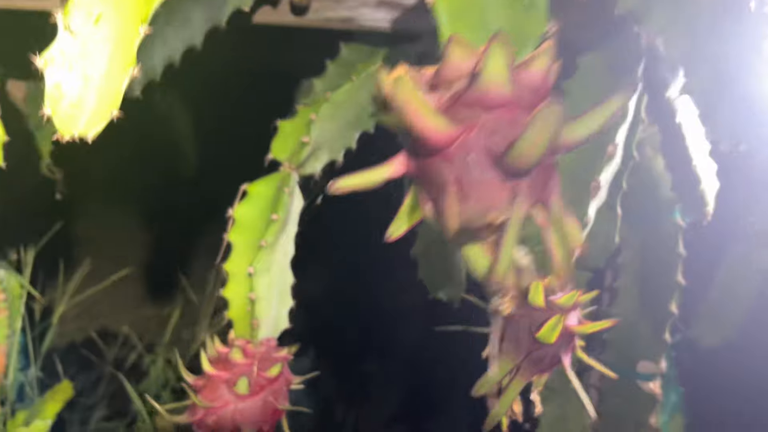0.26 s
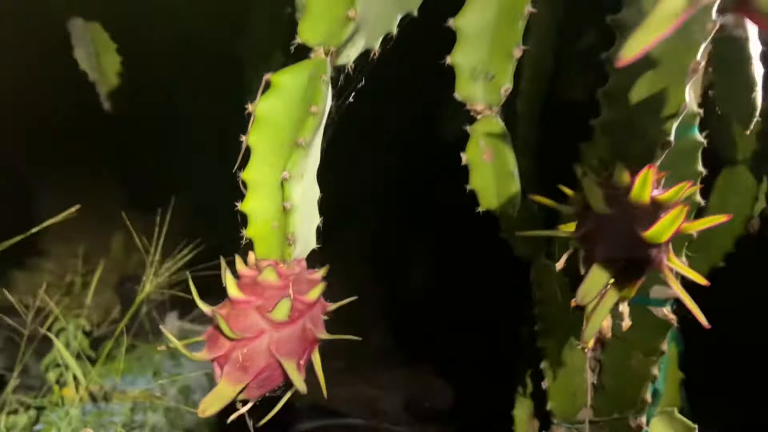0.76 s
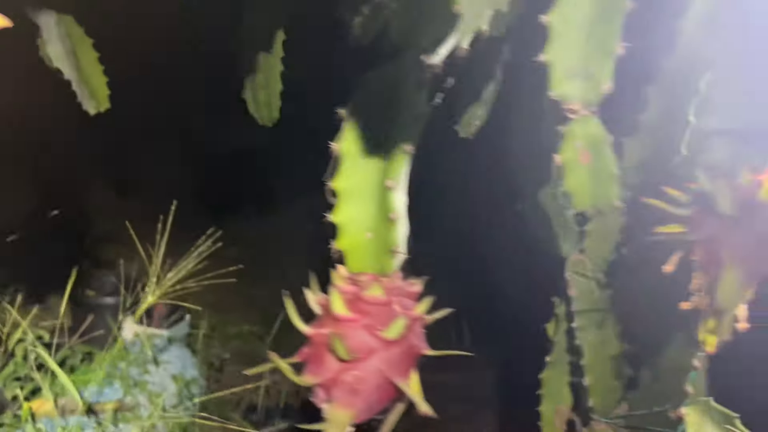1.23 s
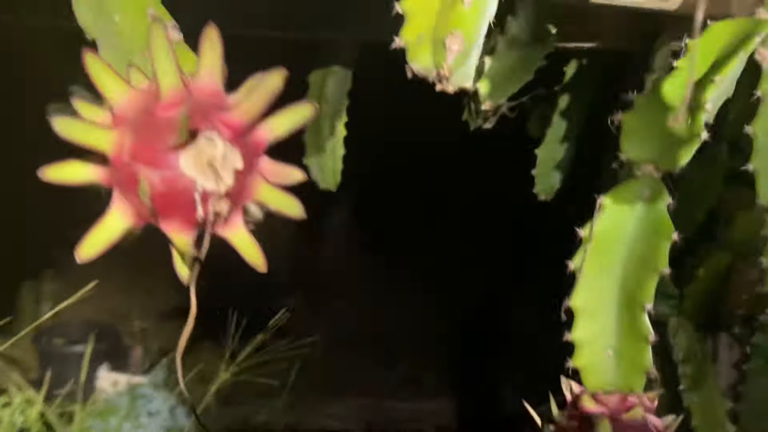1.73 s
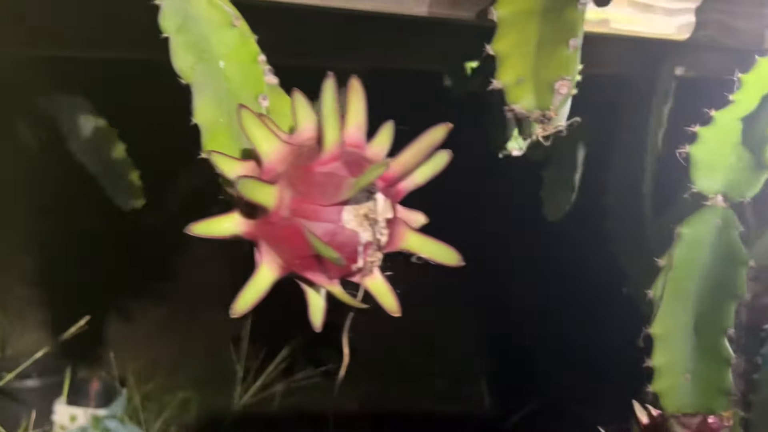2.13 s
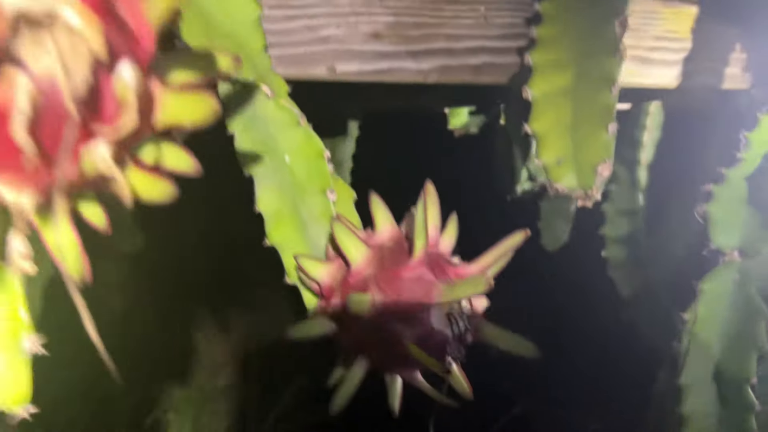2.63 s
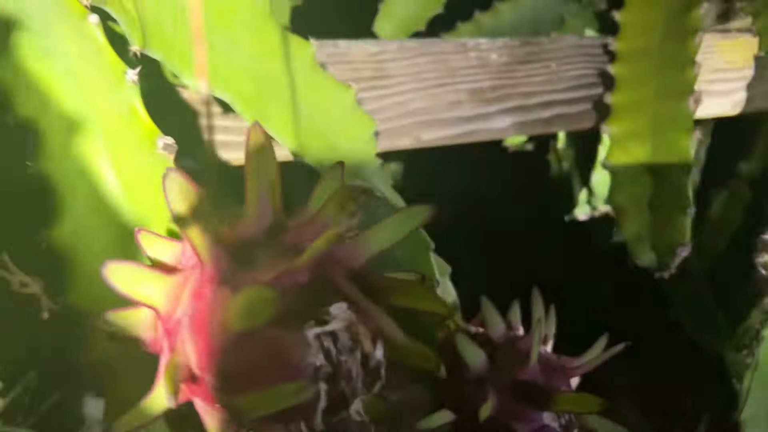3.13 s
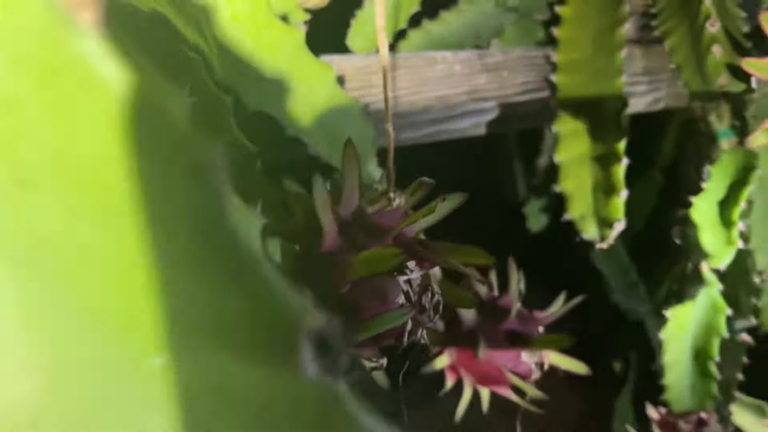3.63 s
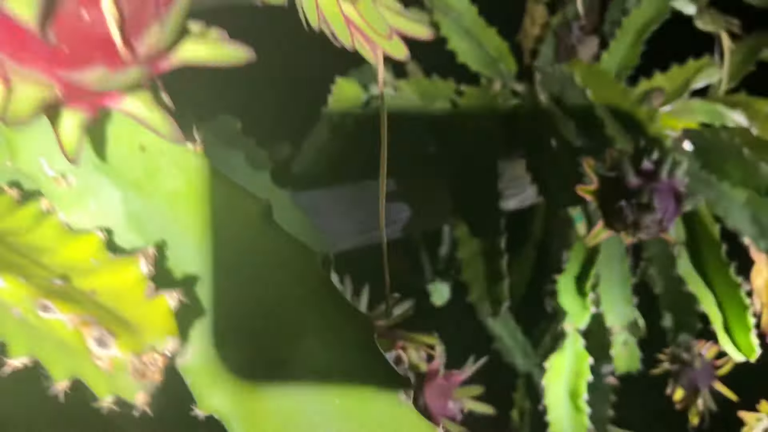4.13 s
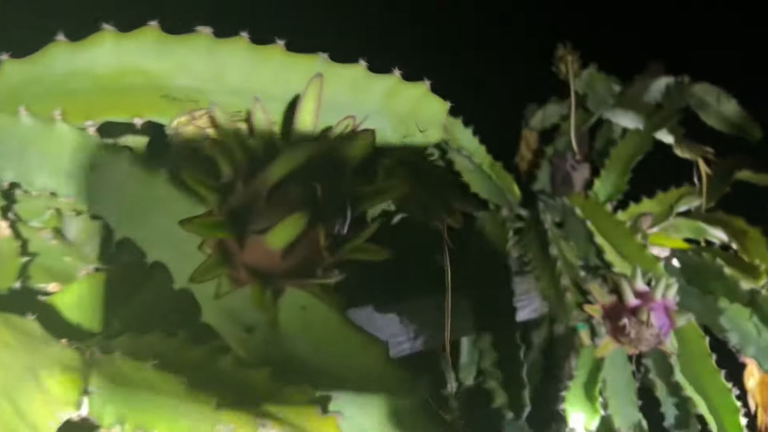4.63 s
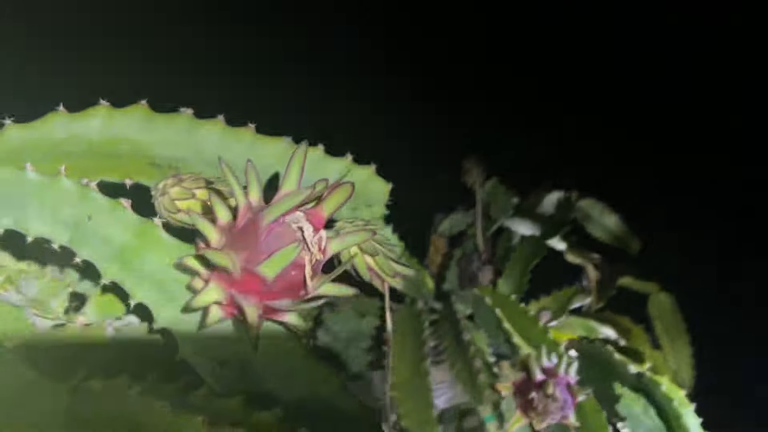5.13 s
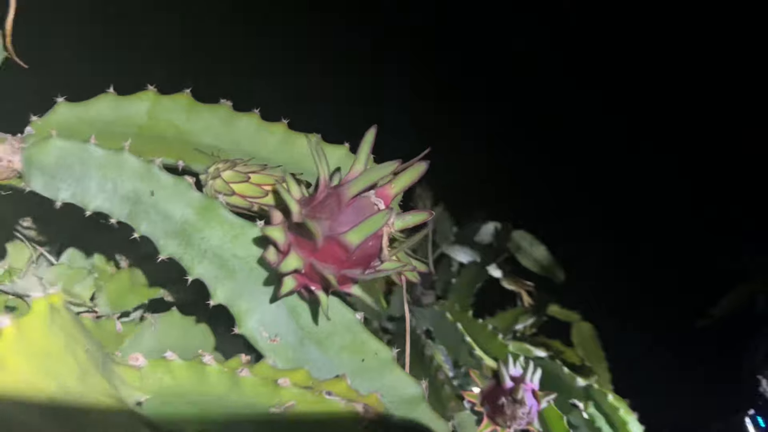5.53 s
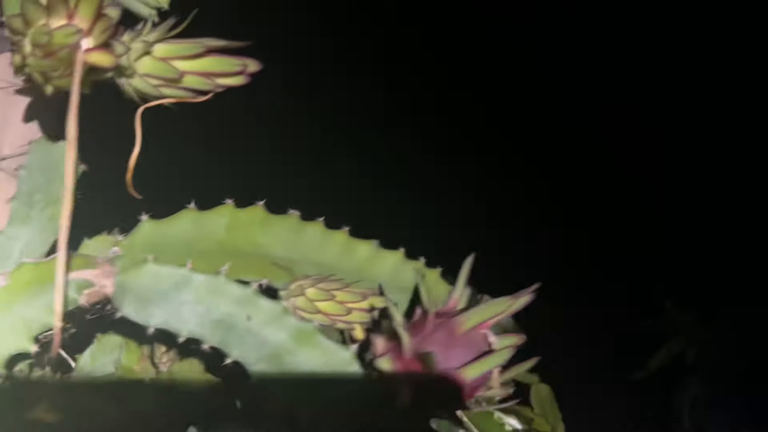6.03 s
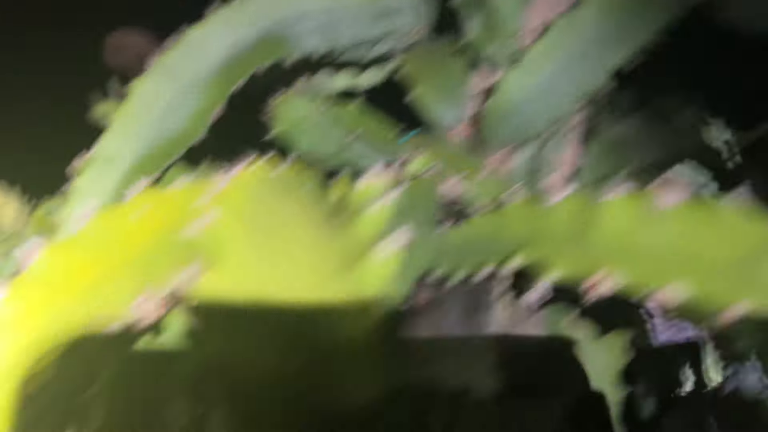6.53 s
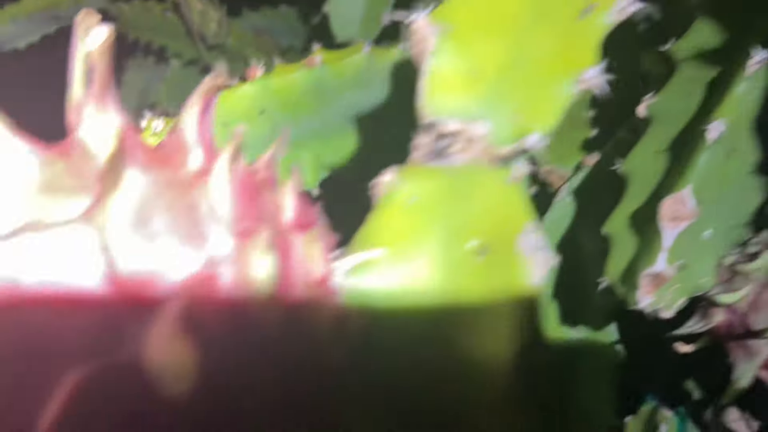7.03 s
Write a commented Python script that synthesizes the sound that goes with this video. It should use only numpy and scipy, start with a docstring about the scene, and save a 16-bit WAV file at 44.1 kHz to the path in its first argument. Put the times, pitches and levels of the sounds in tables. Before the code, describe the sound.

Steady high insect shrilling at night, distant frogs answering a close whistling frog, with leaves brushing, soft footfalls and dry crunches growing busier.

```python
"""Fruit farm at night, among cactus vines. A near coqui frog calls "co-qui" three times, as gliding tones with
weak harmonics and delayed echoes; others answer from afar, blurred by dense echoes. Insects shrill steadily:
noise through narrow resonances, and trains of wing-stroke tones. Someone steps slowly through the plants:
stems and leaves brush as coloured noise, dry litter crunches as runs of fractures, and soft footfalls thud
as decaying, sinking tones. One passage comes twice."""
import sys
import numpy as np
from scipy import signal
from scipy.fft import rfft, irfft
from scipy.io import wavfile

SR = 44100
rng = np.random.default_rng(int(sys.argv[2]) if len(sys.argv) > 2 else 0)


def unload_audio(sound):
    """Save the sound as a 16-bit wav file, at the path given as the first command line argument."""
    columns = np.transpose(np.atleast_2d(sound))
    # keep every value between -1 and 1, then stretch to whole-number steps
    steps = np.round(np.clip(columns, -1, 1) * 32767)
    wavfile.write(sys.argv[1], SR, steps.astype(np.int16))


N = 321035
TIME = np.arange(N) / SR

# In all tables, balance_db is left over right, and the level_db of a spectrum is relative.
# Shape of a frog's low note, scaled for each call: [start_s, pitch_hz, level_db]
CO = [(0, 1540, -16), (.006, 1510, 2), (.022, 1533, 7.5), (.05, 1510, 3.5), (.07, 1510, 2.5),
      (.09, 1497, -6.5), (.103, 1520, -20), (.115, 1490, -58)]


def from_db(db):
    """Decibels are twenty times the logarithm of the amplitude ratio."""
    return 10 ** (np.asarray(db) / 20)


def rms_one(x):
    """Power is the mean square: scale it to one."""
    return x / np.sqrt(np.mean(x ** 2) + 1e-20)


def curves(rows, t=TIME):
    """Linear interpolation in time of each column after the first."""
    s, *columns = np.transpose(rows)
    return [np.interp(t, s, column) for column in columns]


def pan(balance_db):
    """Interaural level difference: left and right gains, each taking half of it."""
    return from_db(np.array([[.5], [-.5]]) * balance_db)


def add(out, start_s, sound):
    """Superposition: mix a short stereo sound in at a time."""
    at = max(round(start_s * SR), 0)
    out[:, at:at + sound.shape[1]] += sound[:, :N - at]


def twice(rows):
    """Repetition: one passage is heard twice; events from 2.8 s to 4.15 s are played again 3.117 s later."""
    passage_s, passage_end_s, return_s = 2.8, 4.15, 3.117
    again = [(s + return_s, *rest) for s, *rest in rows if passage_s <= s < passage_end_s]
    return list(rows) + again


def stereo_noise(likeness, size=N):
    """Partial coherence: white noise whose two sides have the given correlation."""
    mid, side = rng.standard_normal((2, size))
    alike = np.clip(likeness, -1, 1)
    return (np.sqrt(1 + alike) * mid + np.sqrt(1 - alike) * side * [[1], [-1]]) / np.sqrt(2)


def drift(rate):
    """Random modulation of unit power: straight lines between chance values, rate of them per second."""
    knots = rng.standard_normal(4096)
    return rms_one(np.interp(TIME * rate, np.arange(len(knots)), knots))


def colour(x, spectrum, size=4096):
    """Minimum-phase filtering by the folded cepstrum; white noise keeps its power."""
    hz, db = np.transpose(spectrum)
    log_bins = np.log(np.fft.rfftfreq(size, 1 / SR) + 1)
    gain = from_db(np.interp(log_bins, np.log(hz), db))
    cepstrum = irfft(np.log(gain / np.sqrt(np.mean(gain ** 2))))
    # Folding negative time onto positive time makes the response causal
    cepstrum[1:size // 2] *= 2
    cepstrum[size // 2 + 1:] = 0
    response = irfft(np.exp(rfft(cepstrum)))
    return signal.oaconvolve(x, response[None], axes=1)[:, :N]


def scatter(x, t60, size=30000):
    """Diffuse scattering off the plants: dense decaying echoes, different on each side, at unit power."""
    t = np.arange(size) / SR
    echoes = rng.standard_normal((2, size)) * from_db(-60 * t / t60) * (t > .003)
    return signal.oaconvolve(x, rms_one(echoes) / np.sqrt(size), axes=1)[:, :N]


def delayed(x, ms):
    """Propagation delay: the same sound a little later."""
    return np.interp(TIME - ms / 1000, TIME, x, left=0)


def night_air():
    """Broadband noise, nearly incoherent between the sides: the faint hiss of still air, drifting in level."""
    # Spectrum of the night: [frequency_hz, level_db]
    night = [(20, -24), (60, 6.5), (150, 7), (450, 1.5), (1000, 5.5), (1600, 7.5), (2100, -1), (2800, 2.5),
             (3600, -9), (7500, -39), (9000, -84), (15500, -41)]
    level_db = -69.5 + 2.2 * drift(4.2)
    return from_db(level_db) * colour(stereo_noise(likeness=0.036), night)


def stirring_air():
    """Local turbulence: low noise on each microphone port, largely opposite in sign on the two."""
    # Spectrum of the stirring: [frequency_hz, level_db]
    stir_spectrum = [(15, -9), (45, 5.5), (70, 5), (140, -21), (400, -67)]
    level_db = -78.5 + 5 * drift(9)
    return from_db(level_db) * colour(stereo_noise(likeness=-0.7), stir_spectrum)


def high_buzz(level_db=-68, echo_db=-13, echo_ms=7.1, left_lag_ms=0.2458):
    """Interference and arrival time: a hissing rasp, doubled by a ground echo, reaches the right port first."""
    # Spectrum of the insect: [frequency_hz, level_db]
    buzz_spectrum = [(6500, -93), (8200, -9.5), (9200, 5), (10000, -2), (10700, 7), (11500, 5.5),
                     (12500, -2.5), (13500, -8), (15500, -14)]
    rasp = rng.standard_normal(N)
    rasp = rasp + from_db(echo_db) * delayed(rasp, echo_ms)
    sides = np.array([rms_one(delayed(rasp, left_lag_ms)), rms_one(rasp)])
    return from_db(level_db) * colour(sides, buzz_spectrum)


def chorus(flutter_db=1):
    """Resonance of noise: countless far wing scrapes merge into a few narrow, fluttering bands."""
    # Distant groups of singers: [wing_pitch_hz, spread_hz, relative level_db]
    singers = [(5280, 510, -19.5), (5943, 145, 1), (6050, 93, -2), (6246, 98, -3.5), (6580, 240, -21),
               (6400, 250, -43)]
    out = np.zeros((2, N))
    for hz, width_hz, db in singers:
        r = np.exp(-np.pi * width_hz / SR)   # pole radius of a two-pole resonator
        wing = [1 - r, 0, r - 1, 1, -2 * r * np.cos(2 * np.pi * hz / SR), r * r]
        song = rms_one(signal.sosfilt([wing, wing], stereo_noise(likeness=0)))
        out += song * from_db(db + flutter_db * drift(120))
    return rms_one(out)


def trill(hz, strokes, share, fall_hz, wander_hz=14, unsteady=0.012):
    """Stridulation at unit power: each wing stroke is a short tone that falls in pitch."""
    stroke_rate = strokes * (1 + unsteady * drift(3))
    cycle = (rng.random() + np.cumsum(stroke_rate) / SR) % 1
    stroke = np.minimum(cycle / share, 1)
    pitch = hz + fall_hz * (.5 - stroke) + wander_hz * drift(4.7)
    # The ports hear it a quarter cycle out of step
    phase = 2 * np.pi * np.cumsum(pitch) / SR + [[0], [np.pi / 2]]
    return rms_one(np.sin(np.pi * stroke) ** 2 * np.sin(phase))


def crickets():
    """Amplitude modulation: overlapping nearby trills swell gently in bouts and echo off the leaves."""
    # Single crickets, levels relative to the chorus: [wing_pitch_hz, level_db, strokes_per_s,
    # sounding_share of a stroke, fall_hz within a stroke, bouts_per_s, bout_depth_db, balance_db]
    singles = [(6060, -7, 17.3, .6, 160, 2.6, 2, 3), (6190, -9.5, 17.9, .6, 160, 1.85, 3, 3),
               (6130, -9.5, 13.4, .7, 200, .6, 3, 1), (5920, -8, 15.6, .8, 140, 2.6, 2, -1),
               (6010, -9.5, 58, .8, 220, .45, 2, 0), (6085, -8.5, 5.2, .95, 30, 1.3, 2, 0)]
    out = np.zeros((2, N))
    for hz, db, strokes, share, fall_hz, bouts, bout_db, balance_db in singles:
        bout_rate = bouts * (1 + 0.11 * drift(2.42))
        swell = from_db(bout_db * np.sin(2 * np.pi * np.cumsum(bout_rate) / SR))
        out += from_db(db) * pan(balance_db) * rms_one(swell * trill(hz, strokes, share, fall_hz))
    return out + from_db(-14.5) * scatter(out, t60=0.73)


def insects(gain_db=2, swell_db=.9):
    """Summed sources: the shrill swells a little by chance, and shifts as the microphone turns."""
    # The turning, levels before gain_db: [time_s, level_db, balance_db]
    turning = [(0.0, -49, 6.5), (0.5, -49.5, 8), (1.1, -50.5, 5), (1.6, -49.5, 5.5), (2.15, -52, 3),
               (2.35, -50.5, 7), (3.65, -49.5, 2.5), (3.81, -49.5, 6.5), (4.03, -51, 6), (4.36, -49.5, 7),
               (4.85, -49.5, 5.5), (5.25, -50.5, 6), (6.0, -50, 5.5), (6.77, -48.5, 1), (6.9, -50.5, 5.5),
               (7.28, -51, 4.5)]
    level_db, balance_db = curves(turning)
    gain = from_db(level_db + gain_db + swell_db * drift(8.6))
    return gain * pan(balance_db) * rms_one(chorus() + crickets())


def fast_cricket(balance_db=8):
    """Shadowing: a quick, even trill on the left, just below the chorus, varies in level behind leaves."""
    # The cricket: [wing_pitch_hz, strokes_per_s, sounding_share of a stroke, fall_hz within a stroke]
    wing_strokes = (5430, 38, .8, 400)
    # Level as leaves come between it and the microphone: [time_s, level_db]
    shadowing = [(0, -71), (1.3, -68.5), (1.8, -65.5), (2.3, -63.5), (2.85, -69), (3.2, -66), (3.9, -66.5),
                 (4.4, -63), (5.2, -66.5), (5.9, -69), (6.5, -66), (7.28, -65.5)]
    level_db, = curves(shadowing)
    song = from_db(level_db) * pan(balance_db) * trill(*wing_strokes)
    return song + from_db(-13) * scatter(song, t60=.3)


def note(shape, ratio, octave_db, lag_ms=0, size=7500):
    """Harmonic radiation: the vocal sac sounds a gliding tone; its weak overtones grow with pitch."""
    third_db = -20   # third harmonic, relative to the octave
    t = np.arange(size) / SR
    hz, db = curves(shape, t)
    left_lag = np.array([[lag_ms], [0]]) / 1000
    phase = 2 * np.pi * ratio * (np.cumsum(hz) / SR - hz * left_lag)
    octave = from_db(octave_db) * (hz / hz.max()) ** 4
    overtones = octave * (np.sin(2 * phase) + from_db(third_db) * np.sin(3 * phase))
    return from_db(db) * (t < shape[-1][0]) * (np.sin(phase) + overtones)


def far_frogs(opening_s=0.059):
    """Direct-to-diffuse ratio: neighbours sing at their own pitch and pace, blurred by echo; one peep is thin."""
    # Low notes, relative levels: [start_s, top_pitch_hz, level_db]
    far_lows = [(0.132, 1480, -80.5), (0.361, 1669, -76), (0.52, 1525, -80), (2.86, 1700, -81.5),
                (4.825, 1565, -75.5), (5.575, 1720, -71)]
    # Whistles, relative levels: [start_s, top_pitch_hz, level_db, time_stretch, echo_db, opening_db]
    far_whistles = [(0.415, 2794, -57, 0.88, -0.5, 0), (.572, 3033, -68.5, 0.82, 13, 9),
                    (2.966, 3163, -48, 0.69, 0, -5), (3.11, 3040, -64, 1.07, 3.5, 18),
                    (3.89, 2793, -63, 1.1, 3, 21), (5.103, 2814, -61.5, 1.07, -2, 22.5),
                    (5.337, 3146, -42.5, 0.82, -8, 9)]
    # Shape of a slowly swelling, levelling whistle, scaled for each call: [start_s, pitch_hz, level_db]
    far_shape = [(0, 2440, -24), (.025, 2560, -9), (.05, 2700, -3), (.075, 2840, 0), (.105, 2910, -1),
                 (.128, 2925, -7), (.15, 2900, -28)]
    # Shape of a thin, level peep, relative level: [start_s, pitch_hz, level_db]
    peep_shape = [(0, 3380, -89), (.012, 3380, -63), (.06, 3385, -69), (.105, 3380, -62), (.13, 3375, -85)]
    direct, echoing = np.zeros((2, 2, N))
    low_top_hz = np.array(CO)[:, 1].max()
    for s, hz, db in twice(far_lows):
        call = from_db(db) * note(CO, hz / low_top_hz, octave_db=-42)
        add(direct, s, call)
        add(echoing, s, from_db(11.0) * call)
    for s, hz, db, stretch, echo_db, opening_db in twice(far_whistles):
        shape = np.array(far_shape) * [stretch, 1, 1]
        # The extra level of the opening fades over opening_s
        shape[:, 2] += opening_db * np.clip(1 - shape[:, 0] / opening_s, 0, 1)
        call = from_db(db) * note(shape, hz / shape[:, 1].max(), octave_db=-41, size=9000)
        add(direct, s, call)
        add(echoing, s, from_db(echo_db) * call)
    add(direct, 5.04, note(peep_shape, 1, octave_db=-35))
    return from_db(-2) * direct + scatter(echoing, t60=.33)


def brushing(attack_s=0.017, release_s=0.038):
    """Contact envelopes: gains of feet, stems and leaves build up, hold and die away over a faint rustle."""
    # The walker pushes past a plant, levels relative within each part:
    # [start_s, length_s, shuffling feet_db, rubbing stems_db, swishing leaves_db]
    brushes = [(0.233, 0.095, -74, -74, -75), (0.4, 0.087, -67, -80, -84), (0.832, 0.25, -79, -67, -74),
               (0.939, 0.18, -66, -63.5, -68), (1.195, 0.054, -65, -57.5, -62),
               (1.38, 0.24, -67, -72.5, -75.5), (2.024, 0.31, -86, -70, -73),
               (2.378, 0.16, -59.5, -64, -65.5), (2.62, 0.15, -58, -59.5, -59),
               (2.968, 0.51, -87, -81, -65), (3.315, 0.14, -61, -62.5, -53.5), (3.444, 0.22, -67, -72, -74),
               (3.64, 0.22, -57.5, -64, -71), (3.79, 0.11, -59, -56, -59), (4.19, 0.19, -59, -65.5, -68),
               (4.46, 0.15, -68, -64.5, -61.5), (4.565, 0.16, -63, -62.5, -66),
               (4.902, 0.12, -61, -67.5, -67.5), (5.157, 0.083, -80, -59.5, -62),
               (5.285, 0.17, -51.5, -54.5, -79), (5.452, 0.38, -59, -69.5, -85),
               (5.56, 0.084, -50, -56, -64.5), (5.737, 0.15, -62, -60.5, -59.5)]
    # The faint rustle between brushes, reference level: [time_s, level_db]
    faint_rustle = [(0.0, -80), (0.43, -72), (0.68, -79), (0.97, -72), (1.35, -82), (1.7, -68),
                    (3.33, -63.5), (3.75, -64.5), (3.95, -69), (4.52, -61.5), (4.75, -68), (4.95, -76),
                    (5.27, -66.5), (5.82, -67.5), (6.45, -62.5), (6.87, -63.5), (7.07, -73.5), (7.28, -63)]
    t = TIME[::100]
    faint_db, = curves(faint_rustle, t)
    faint_parts_db = np.array([[-7.5], [-10.5], [-3]])   # feet, stems, leaves
    power = from_db(faint_db + faint_parts_db) ** 2
    for start, length, *parts_db in twice(brushes):
        attack = np.clip((t - start) / attack_s, 0, 1)   # contact builds up
        release = np.exp(-np.clip((t - start - length) / release_s + 1, 0, 20))   # the plant swings free
        power = power + np.outer(from_db(parts_db), attack * release) ** 2
    return [np.interp(TIME, t, gain) for gain in np.sqrt(power)]


def rustle(feet, stems, leaves, grain_db=2.0):
    """Stick-slip friction: feet rumble, stems rub and leaves swish in uneven tugs, catches and slips."""
    # Spectra of feet, stems and leaves: [frequency_hz, level_db]
    feet_spectrum = [(20, -43), (60, 0), (120, 7.5), (200, 7), (320, -9.5), (700, -67)]
    stem_spectrum = [(120, -9), (330, 1), (430, 0.5), (600, -8), (1050, 1), (1700, -5), (2500, -26),
                     (4000, -30), (8000, -64)]
    leaf_spectrum = [(1000, -6), (2200, 2), (3800, -1), (5200, -1.5), (7500, -8), (11000, -20.5),
                     (15500, -20)]
    tugs_db = 2.4 * drift(45)
    catches = rms_one(from_db(grain_db * (drift(110) + drift(450)) + tugs_db))
    rumble = from_db(-5.0) * feet * colour(stereo_noise(likeness=0.86), feet_spectrum)
    rub = from_db(2.36) * stems * colour(catches * stereo_noise(likeness=0.58), stem_spectrum)
    leaf_noise = rms_one(np.sqrt(catches)) * stereo_noise(likeness=0.022)
    swish = from_db(3.5) * leaves * colour(leaf_noise, leaf_spectrum)
    # Around 5940 Hz the left port hears the leaves more than the right
    ring = signal.lfilter(*signal.iirpeak(5940, 7.1, fs=SR), swish)
    return (rumble + rub) * pan(1.9) + (swish + pan(11.5) * ring) * pan(0.95)


def crunch_colour(sharp_db, ring_hz):
    """Damped resonance: a drier stem snaps more brightly, and each has a broad ring of its own."""
    # Colour of a crunch: [frequency_hz, level_db, share of the sharpness]
    snap_spectrum = [(60, -39.5, 0.48), (240, -6.5, 0), (487, -0.5, 0.036), (794, 0, 0.13), (1200, -1.5, 0),
                     (1810, -6, 0.33), (2840, -22, 0.97), (5460, -27, 0.73), (7550, -52, 1),
                     (14900, -86, 1)]
    ring_db, ring_octaves = 9, 0.26   # height and width of the ring
    hz = np.geomspace(60, 15000, 64)
    table_hz, *columns = np.transpose(snap_spectrum)
    db, share = [np.interp(np.log(hz), np.log(table_hz), column) for column in columns]
    ring = ring_db * np.exp(-(np.log2(hz / ring_hz) / ring_octaves) ** 2)
    return np.transpose([hz, db + sharp_db * share + ring])


def crackle(stems, crackle_db=-5.0):
    """Random impulses: under the rubbing, fibres and dry leaves snap, each with one of a few rings."""
    out = 0
    for ring_hz in (700, 1200, 2100):
        snap_gain = from_db(4 * np.minimum(rng.exponential(1, N), 2))
        snaps = (rng.random(N) < 50 / SR) * snap_gain   # about 50 per second
        signs = np.sign(stereo_noise(likeness=0.73))
        out = out + colour(snaps * signs, crunch_colour(sharp_db=8.0, ring_hz=ring_hz))
    return from_db(crackle_db) * stems * rms_one(out)


def squeak(rough=.5):
    """Frictional oscillation: two stems slip on each other in a brief, rough tone of level pitch."""
    # One squeak: [start_s, level_db, pitch_hz, length_s]
    stem_slip = (1.034, -48, 810, .031)
    start, db, hz, length = stem_slip
    swell = np.sin(np.pi * np.clip((TIME - start) / length, 0, 1)) ** 2
    tone = np.sin(2 * np.pi * hz * TIME + rough * drift(350))
    return from_db(db) * pan(2) * swell * (1 + rough * drift(420)) * tone


def footfalls(sag=0.3, rise_s=0.0018):
    """Damped oscillation: a soft thud whose pitch sinks as the weight settles."""
    # Footfalls on soft soil: [start_s, level_db, starting pitch_hz, decay_s]
    thuds = [(1.09, -52, 180, 0.0071), (2.594, -43, 150, 0.0068), (2.966, -57, 68.6, 0.029),
             (3.654, -44, 211, 0.018), (3.696, -52, 65, 0.018), (4.208, -44, 174, 0.01),
             (4.248, -47, 150, 0.0099), (4.565, -48.5, 187, 0.025), (4.615, -42, 143, 0.013),
             (4.683, -36.5, 125, 0.0081), (5.298, -42, 125.6, 0.043), (5.388, -44.5, 155, 0.029),
             (5.592, -40, 131, 0.018), (5.624, -40, 80, 0.013)]
    out, t = np.zeros((2, N)), np.arange(SR // 4) / SR
    for s, db, hz, decay_s in twice(thuds):
        pitch = hz * (1 - sag * (1 - np.exp(-t / decay_s / 2)))
        phase = 2 * np.pi * np.cumsum(pitch) / SR
        envelope = (1 - np.exp(-t / rise_s)) * np.exp(-t / decay_s)
        add(out, s, from_db(db) * pan(1.9) * np.sin(phase) * envelope)
    return out


def crunches(rise=0.12, crunch_db=-2.0):
    """Brittle fracture: a run of uneven breaks over fine grit builds up quickly and dies away."""
    # Dry litter and stems giving way, levels before crunch_db:
    # [start_s, level_db, decay length_s, sharpness_db, stem ring_hz]
    breaks = [(0.09, -63.5, 0.008, 14, 1320), (0.238, -61.5, 0.013, 4, 930),
              (0.563, -52.5, 0.015, -9, 1010), (0.767, -59.5, 0.017, 3, 873),
              (0.859, -56.5, 0.0088, 3, 1000), (0.9, -57.5, 0.015, 14, 930), (0.96, -57.5, 0.025, 7, 627),
              (1.203, -56.5, 0.0085, 11, 1410), (1.2235, -45.5, 0.0021, 17, 1560),
              (1.227, -47.5, 0.0028, 12, 970), (1.455, -68, 0.009, 15, 770), (1.571, -57, 0.004, -3, 850),
              (1.59, -59.5, 0.008, 4, 900), (1.795, -63, 0.022, 14, 626), (2.2, -64, 0.004, 4, 970),
              (2.405, -54.5, 0.024, 2, 1600), (2.426, -48.5, 0.0075, 12, 550),
              (2.44, -50, 0.0055, 15, 1260), (2.461, -44.5, 0.0065, 4, 660), (2.466, -42, 0.0041, 22, 845),
              (2.553, -37.5, 0.0043, 10, 1160), (2.577, -47, 0.0085, 20, 710),
              (2.591, -37.5, 0.0031, -16, 720), (2.649, -46, 0.0042, 7, 1230), (2.657, -46, 0.003, 5, 900),
              (2.69, -49, 0.0024, 2, 1400), (2.804, -53, 0.0021, 27, 2600), (3.205, -57.0, 0.0099, 10, 928),
              (3.578, -55, 0.0062, 27, 1410), (3.598, -55, 0.017, 24, 1060), (3.65, -47.5, 0.0058, 27, 526),
              (3.686, -62, 0.0063, -2, 690), (3.696, -46.5, 0.0058, 15, 744),
              (3.746, -45.5, 0.005, 12, 1500), (3.751, -44.5, 0.0074, 7, 710),
              (3.798, -38, 0.0023, 19, 960), (3.808, -35, 0.005, 21, 487), (3.826, -46, 0.0071, 23, 1090),
              (3.857, -40.5, 0.0033, 20, 1410), (4.204, -53.5, 0.016, 14, 1050),
              (4.247, -49.5, 0.0061, -1, 1000), (4.313, -51, 0.0095, 12, 1480),
              (4.375, -51.5, 0.0053, 4, 900), (4.385, -45.5, 0.0035, 1, 900), (4.42, -49, 0.0028, 7, 1190),
              (4.57, -48, 0.0068, -3, 1150), (4.598, -51.5, 0.013, -5, 455), (4.634, -46, 0.0046, 1, 1620),
              (4.675, -44.5, 0.0048, 4, 1280), (4.88, -35.5, 0.0032, -2, 1200),
              (4.895, -50.5, 0.0073, 9, 1660), (4.943, -48, 0.007, 20, 2180),
              (4.964, -44.5, 0.0045, 4, 1220), (5.076, -60, 0.0028, 2, 1710),
              (5.233, -47.5, 0.011, 13, 1200), (5.253, -42, 0.015, 2, 765), (5.275, -47.5, 0.028, 8, 604),
              (5.3078, -28.5, 0.0027, 17, 1850), (5.312, -30.5, 0.0062, 16, 1290),
              (5.3165, -34, 0.0047, 14, 1280), (5.323, -42, 0.017, 20, 630),
              (5.354, -39.5, 0.0079, 7, 1290), (5.363, -44, 0.0088, 12, 1280),
              (5.394, -35, 0.0073, 12.5, 1090), (5.406, -36, 0.0071, 3, 1060),
              (5.465, -44.5, 0.0076, 2, 1260), (5.503, -47, 0.0067, 17, 1010),
              (5.511, -44.5, 0.006, 0, 940), (5.558, -49, 0.021, -2, 1290), (5.577, -37, 0.016, -5, 1200),
              (5.588, -41, 0.012, 12, 915), (5.604, -41, 0.0032, 13, 2080), (5.63, -47.5, 0.012, 4, 820),
              (5.686, -45.5, 0.0087, -2, 1196), (5.711, -51.5, 0.0091, -12, 610),
              (5.765, -47, 0.012, -3, 480)]
    # Where the litter lies as the walker turns: [time_s, balance_db]
    litter_side = [(.5, 2.5), (1.2, 11.5), (2.5, 3), (3.7, 1.5), (4.6, 2), (5.3, 1.5), (5.6, 0), (6.9, 1.5)]
    out = np.zeros((2, N))
    t = np.arange(SR // 12) / SR
    for s, db, length, sharp_db, ring_hz in twice(breaks):
        balance_db, = curves(litter_side, s)
        sizes = from_db(4 * rng.standard_normal(len(t)))
        fractures = (rng.random(len(t)) < 1400 / SR) * sizes + .09   # the constant is the grit
        envelope = (1 - np.exp(-t / (rise * length))) * np.exp(-(t / length) ** 2)
        burst = stereo_noise(likeness=0.65, size=len(t)) * fractures * envelope
        burst = colour(burst, crunch_colour(sharp_db, ring_hz), size=2048)
        burst = burst * np.sqrt(length * SR / np.sum(burst ** 2) * 2)   # energy in step with length
        add(out, s, from_db(db + crunch_db) * pan(balance_db) * burst)
    return out + from_db(-11) * scatter(out, t60=.08)


def near_frog(trellis_echo_s=0.027):
    """Multipath interference: "co", then a gliding "qui" that beats with its echoes, unlike on each side."""
    # Low notes: [start_s, level_db, balance_db, left_lag_ms, octave_db]
    near_lows = [(0.422, -46, 15.5, 0.039, -17), (3.006, -37, -4.5, 0.25, -18.5)]
    # Whistles: [start_s, level_db, time_stretch, balance_db, octave_db, trellis_echo_db,
    # paths (direct, off the ground, off a post), each (delay_ms, level_db, left_lag_ms)]
    near_whistles = [(.677, -29.2, .96, -4.9, -31, -23, [(0, 0, -.04), (.58, -9.2, .07), (5.81, -15, .04)]),
                     (3.261, -27.6, 1, -1.1, -37, -20, [(0, 0, .11), (.97, -11.3, -.29), (8.56, -16, .14)])]
    # Shape of the rising whistle, scaled for each path: [start_s, pitch_hz, level_db]
    near_shape = [(0, 2100, -22), (.002, 2200, -6), (.006, 2320, -2), (.012, 2410, .5), (.024, 2485, .5),
                  (.04, 2575, -.5), (.06, 2660, -1.5), (.082, 2785, -.5), (.104, 2875, .5), (.12, 2912, -2),
                  (.133, 2935, -9), (.15, 2930, -30)]
    low, high, trellis = np.zeros((3, 2, N))
    for s, db, balance_db, lag_ms, octave_db in twice(near_lows):
        add(low, s, from_db(db) * pan(balance_db) * note(CO, 1, octave_db, lag_ms))
    for s, db, stretch, balance_db, octave_db, trellis_db, paths in twice(near_whistles):
        shape = np.array(near_shape) * [stretch, 1, 1]
        gain = from_db(db) * pan(balance_db)
        for late_ms, path_db, lag_ms in paths:
            arrival_s = round(s * SR) / SR + late_ms / 1000
            add(high, arrival_s, gain * from_db(path_db) * note(shape, 0.99, octave_db, lag_ms))
        add(trellis, s + trellis_echo_s, gain * from_db(trellis_db) * note(shape, 1, octave_db))
    scattered = high + from_db(-16) * low
    close_leaves = from_db(-20) * scatter(scattered, t60=.12) + scatter(trellis, t60=.33)
    return low + high + close_leaves + from_db(-20.0) * scatter(scattered, t60=0.53)


def scene():
    """Superposition: frogs, insects and steps over the faint hiss of the night."""
    background = night_air() + stirring_air() + high_buzz() + insects() + fast_cricket()
    feet, stems, leaves = brushing()
    steps = rustle(feet, stems, leaves) + crackle(stems) + squeak() + footfalls() + crunches()
    return background + far_frogs() + steps + near_frog()


def record(dry):
    """Band limiting: deep rumble is rolled off below 38 Hz and the top is cut steeply above 15650 Hz."""
    dry = signal.sosfilt(signal.butter(4, 38, "high", fs=SR, output="sos"), dry)
    return signal.sosfilt(signal.ellip(12, .1, 90, 15650, fs=SR, output="sos"), dry)


dry = scene()
out = record(dry)
unload_audio(out)
```